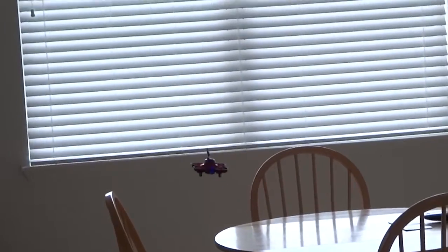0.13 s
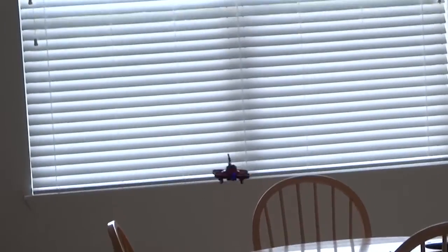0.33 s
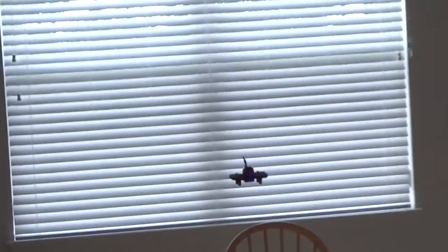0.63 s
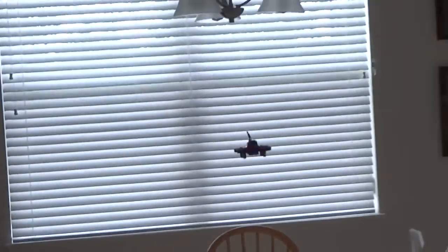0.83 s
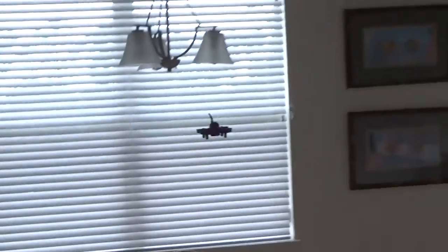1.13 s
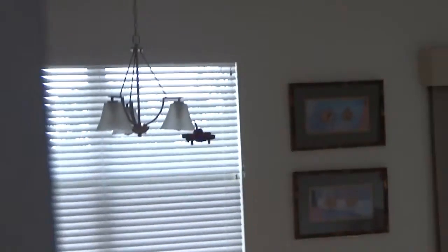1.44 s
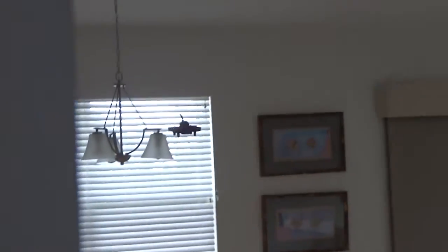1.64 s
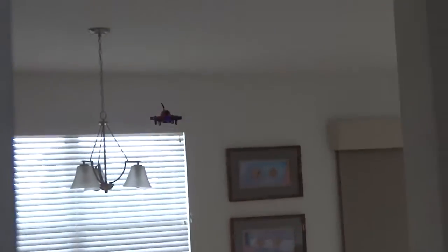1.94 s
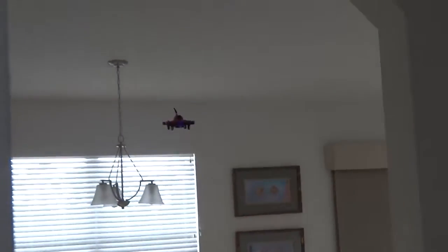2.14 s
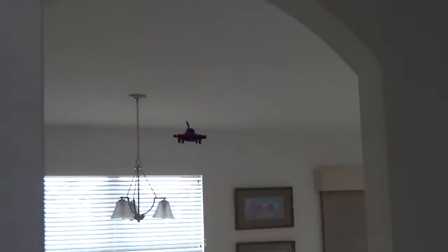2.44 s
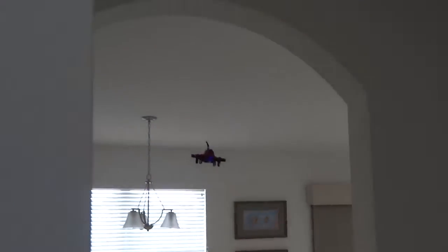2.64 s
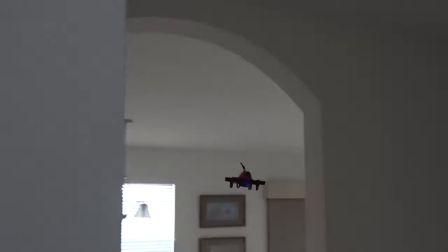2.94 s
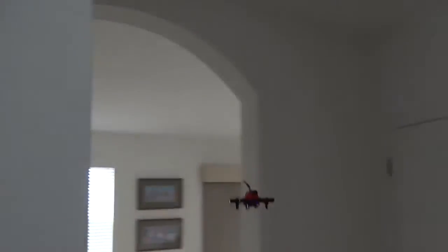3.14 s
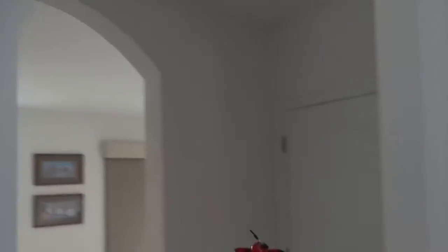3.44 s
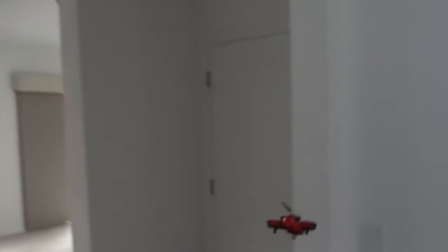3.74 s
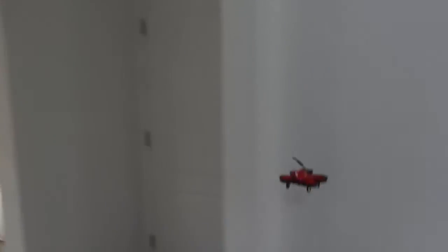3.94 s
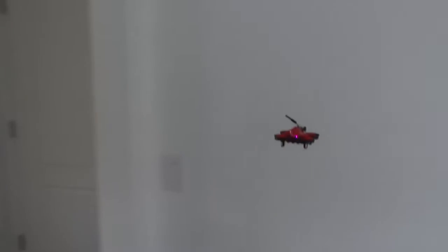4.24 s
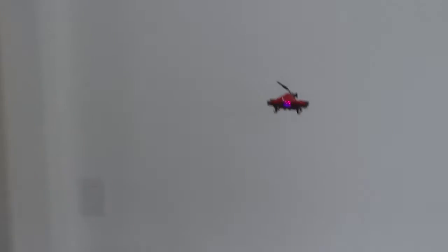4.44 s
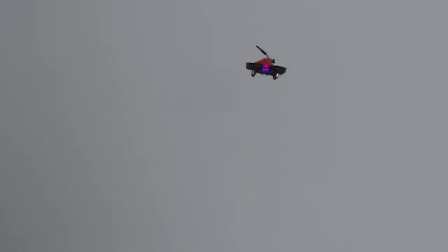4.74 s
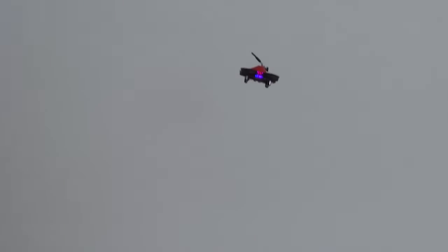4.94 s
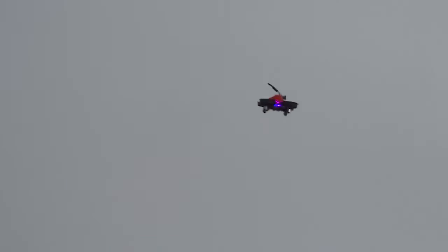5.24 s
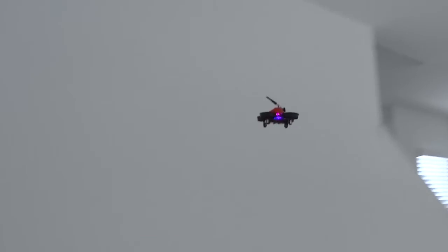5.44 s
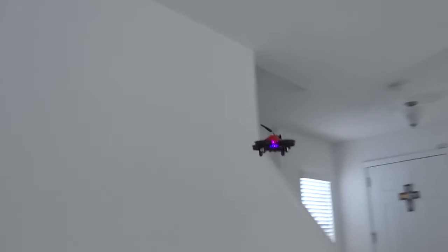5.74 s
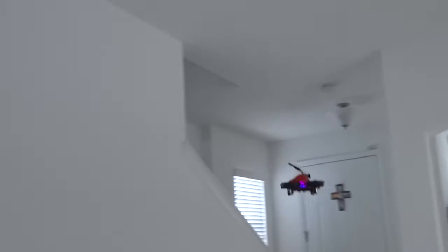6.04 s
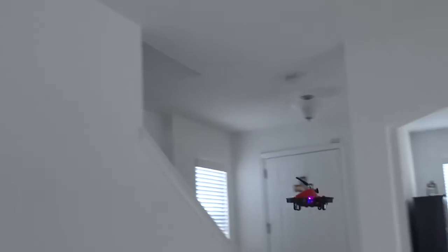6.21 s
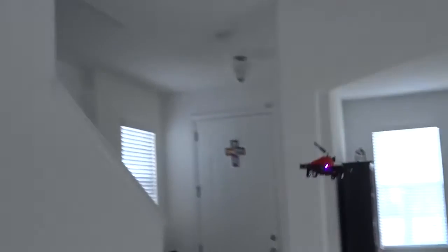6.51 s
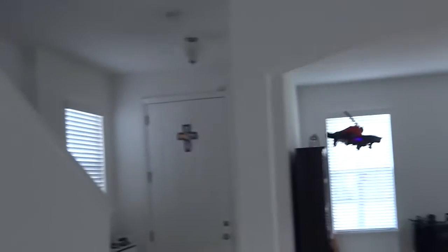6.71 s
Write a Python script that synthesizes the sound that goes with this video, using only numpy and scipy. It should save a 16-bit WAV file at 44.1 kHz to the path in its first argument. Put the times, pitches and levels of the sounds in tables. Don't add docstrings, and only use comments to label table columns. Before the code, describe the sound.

A miniature four-rotor drone is already flying at 0 s, whining without a break in a hard-walled living room. Four slightly different blade tones around 1.6 to 1.9 kHz beat roughly together, with buzzing overtones, rushing air, bright blade hiss and a thin wavering whistle near 10 kHz. Two sharp plastic clicks snap close to the microphone at about 0.37 and 0.53 s, the second louder. A faint scuff comes near 2 s. The drone is faintest around 1.7 s, then approaches; pitch surges from 3.4 s and it is loudest near 3.8 to 4.1 s. A soft step lands at 4.2 s. Pitch sags around 5 s, a tap and scuff fall at 5.5 to 5.6 s, and throttle rises again from 6.2 s, the drone still close at the end. Wall echoes and very faint low house rumble surround it, almost centred.

```python
import sys
import numpy as np
from scipy import signal
from scipy.fft import rfft, irfft
from scipy.io import wavfile
from scipy.ndimage import uniform_filter1d

SR = 44100
rng = np.random.default_rng(int(sys.argv[2]) if len(sys.argv) > 2 else 0)


def generate_wav(signal):
    frames = np.transpose(np.atleast_2d(signal))
    scaled = np.clip(frames, -1, 1) * 32767
    pcm = np.round(scaled).astype(np.int16)
    wavfile.write(sys.argv[1], SR, pcm)


def invert_db(x):
    u = np.asarray(x, float) / 20
    return 10 ** u


N = 302967
T = np.arange(N) / SR
SOUND_M_S = 343

# (frequency [Hz], density [dB per Hz])
HOUSE_COLOUR = [(20, -31), (60, -12), (100, -7), (130, -1.5), (200, 6.5), (400, 2.5), (800, -5),
                (2000, -39)]
# (time [s], level [dB], centre [Hz], t60 [s])
STEPS = [
    (1.02, -52, 700, 0.98),
    (1.977, -43, 750, 0.18),
    (2.0, -50, 555, 0.6),
    (3.55, -50, 450, 1.3),
    (4.174, -44, 600, 0.11),
    (4.218, -35.5, 596, 0.25),
    (4.25, -40.5, 600, 0.67),
    (5.503, -33.5, 800, 0.067),
    (5.51, -40, 620, 1.03),
    (5.612, -40.5, 746, 0.8),
]
# (time [s], crack level [dB], crack [Hz], body level [dB])
CLICKS = [
    (.3655, -18, 2700, -33),
    (.53372, -9.5, 3500, -29),
    (.5125, -35, 2000, -40),
    (.5205, -33, 2400, -42),
]
# (time [s], nearness as tip hiss level [dB],
#          facing of front ducts [dB], rear ducts [dB], motor drive [dB])
FLIGHT = [(0, -36.5, -2.5, -13, -7), (.2, -37, -3, -18.5, -5), (.52, -37.5, -11, -12, -3.5),
          (.9, -37, -1, -15, -6.5), (1.3, -38.5, -4.5, -16, -3.5), (1.7, -39.5, -3, -9.5, -7.5),
          (2.28, -33.5, -3.5, -14.5, -5.5), (3.06, -32.5, -10.5, -15, -10), (3.2, -31, 3, -11, -13),
          (3.36, -30, -7, -19, -13), (3.8, -27, -1.5, -15.5, -18), (4.1, -27.5, 0, -15, -18),
          (4.6, -30, -2, -3.5, -12), (4.9, -31, -10, -6.5, -8), (5.57, -29.5, -9.5, -13, -13),
          (5.97, -28.5, -6, -13, -24), (6.2, -28, -2, -12.5, -13.5), (6.87, -29.5, -2, -7, -1.5)]
# (time [s], speed towards camera [m/s])
APPROACH = [(0, .9), (.5, .85), (.9, .55), (1.4, .6), (2.2, 1), (2.5, 1.15), (3, 1), (3.4, .25), (4, .1),
            (4.6, -.1), (5.5, .05), (6.2, .1), (6.87, -.2)]
# (time [s], rotor 1 [Hz], rotor 2 [Hz], rotor 3 [Hz], rotor 4 [Hz])
SHAFT_HZ = [(0, 443.6, 438, 406.6, 405.8), (.36, 459.5, 446.5, 415.5, 413.5),
            (.62, 449.5, 440.5, 410.5, 409.5), (1.6, 441, 429.5, 405, 403),
            (1.85, 434, 424.5, 402.5, 384.5), (2.8, 436.5, 428.5, 396, 377.5),
            (3.34, 440.5, 435.5, 402.5, 373), (3.47, 462.5, 456, 405, 400),
            (3.76, 471.5, 458.5, 427.5, 403), (4.1, 475, 466.5, 449, 424), (4.4, 464, 459.5, 452, 425),
            (4.66, 438.5, 433.5, 428.5, 404.5), (5.06, 426.5, 418, 414.5, 386),
            (5.45, 432, 418, 399.5, 378.5), (6.01, 431.5, 416.5, 406, 380), (6.3, 466, 453.5, 441.5, 418.5),
            (6.6, 456.5, 452.5, 442, 426), (6.87, 476, 443.5, 435, 431)]
# (shaft multiple, rotors 1 to 4 re duct rush [dB, dB, dB, dB], blur [Hz])
OVERTONES = [(3, -32.5, -33.5, -28, -35.5, 15), (5, -19, -24, -21, -24, 18), (6, -23, -39, -41, -55, 11),
             (7, -24, -18.5, -16, -21.5, 25), (9, -46, -29.5, -25.5, -33.5, 27),
             (12, -20.5, -14, -15.5, -14.5, 40), (16, -18, -23, -15, -18, 40), (20, -19, -31, -14, -20, 46)]
HUM_DB = (-45, -40.5, -33.5, -38.5)
BLADE_DB = (-4.5, -4.5, -2, -4.5)
OCTAVE_DB = (-15, -13, -16, -12.5)
# (share of Doppler shift [ratio], sideways drift [Hz], level [dB])
WHISTLE_ECHOES = [(-1.1, 0, -5), (-.3, 0, -10), (.4, 16, -10), (.1, -20, -7)]
# (delay [s], path growth re approach speed [ratio], level [dB])
WALLS = [(.012, 2, -6), (.021, 1.2, -8)]
# (frequency [Hz], density [dB per Hz])
WASH_COLOUR = [(30, -70), (100, -59), (250, -25.5), (500, -14.5), (700, -11.5), (1200, -10), (1600, -5.5),
               (2000, -3.5), (2600, -17), (4000, -29)]
# (frequency [Hz], density [dB per Hz])
RUSH_COLOUR = [(1300, -37), (1600, -7), (2100, -11), (2600, -3.5), (3200, 2.5), (4000, -3), (5200, -2),
               (6200, -2), (8000, 0), (9500, 2), (10500, -8.5)]
# (frequency [Hz], gain [dB])
SHADED_RUSH = [(3800, -30), (5000, 0)]
# (frequency [Hz], density [dB per Hz])
HISS_COLOUR = [(9300, -32.5), (10000, 11), (11800, 6), (13500, 8), (14400, 4.5), (15100, -8), (15750, -2)]
# (frequency [Hz], gain [dB])
DULLED_HISS = [(13500, -30), (14800, 0)]
# (frequency [Hz], side minus mid [dB])
SPREAD = [(30, -5), (110, -10), (380, -12), (700, -9), (1300, -16), (2400, -15), (4400, -14), (8000, -19),
          (10000, -18), (11500, -18), (15000, -30)]

HOUSE_DB = -70.5
ROOM_T60_S, ROOM_DB = 1, -11
WHISTLE_HZ, TOP_HZ = 10020, 15730
MIDDLE_DB = -31
RUSH_DB, WASH_DB, WIDTH_DB = -1, -19, -0.5
RUSH_NEAR, WASH_NEAR, WIDTH_NEAR, HUM_NEAR = -0.035, -0.059, -0.3, 0.67
FACING_SHARE, HUM_FACING = 0.26, 0.44
FADE_DB, OCTAVE_FADE_DB, FADE_HZ = 2, 1.5, 4
WOBBLE_DB_PER_HZ = 0.1234
SHADE_DB_PER_DB = -0.22
DULL_DB_PER_DB = 0.4


def columns(table):
    s, *rest = np.transpose(table)
    return [np.interp(T, s, c) for c in rest]


def shape(x, points):
    hz, db = np.transpose(points)
    log_hz = np.log(np.fft.rfftfreq(x.shape[-1], 1 / SR) + 1)
    gain = invert_db(np.interp(log_hz, np.log(hz), db))
    return irfft(rfft(x) * gain, x.shape[-1])


def unit(x):
    return x / np.sqrt(np.mean(np.abs(x) ** 2))


def walk(rate_hz):
    knots = rng.standard_normal(2000)
    drift = np.interp(T * rate_hz, np.arange(len(knots)), knots)
    return unit(uniform_filter1d(drift, max(int(SR / rate_hz), 1)))


def tone(cycles, blur_hz, rough):
    rough = np.clip(rough, 0, 1)
    scatter = (walk(blur_hz) + 1j * walk(blur_hz)) / np.sqrt(2)
    envelope = np.sqrt(1 - rough) + np.sqrt(rough) * scatter
    return np.sqrt(2) * np.real(envelope * np.exp(2j * np.pi * cycles))


def air(colour, db, flicker_db):
    mid, side = shape(rng.standard_normal((2, N)), colour)
    gain = invert_db(db + flicker_db * walk(9)) / np.std(mid)
    return gain * mid, shape(gain * side, SPREAD)


def house():
    return air(HOUSE_COLOUR, HOUSE_DB, flicker_db=3.1)


def room(x):
    t = T[:SR]
    tails = rng.standard_normal((2, SR)) * invert_db(-60 * t / ROOM_T60_S) * (t > 0.004)
    tails = tails / np.sqrt(np.sum(tails[0] ** 2))
    wet = signal.fftconvolve(x[None], tails, axes=1)[:, :N]
    return invert_db(ROOM_DB) * wet[0], shape(invert_db(-0.5) * wet[1], SPREAD)


def walls(x):
    flown_m = np.cumsum(columns(APPROACH)[0] + 0.5 * walk(0.7)) / SR
    out = x
    for delay_s, growth, db in WALLS:
        heard_s = T - delay_s - growth * flown_m / SOUND_M_S
        out = out + invert_db(db) * np.interp(heard_s, T, x, left=0)
    return out


def steps():
    out = np.zeros(N)
    for s, db, hz, t60_s in STEPS:
        t = T - s
        sole = [(hz / 4, -25), (hz / 1.3, -3), (hz, 0), (hz * 3.5, -5), (hz * 5, -22)]
        grain = unit(shape(rng.standard_normal(N), sole)) * invert_db(2 * walk(90))
        decay = invert_db(db - 60 * np.clip(t, 0, 3) / t60_s)
        attack = np.clip(t / 0.001, 0, 1) * (1 + 0.7 * np.exp(-np.abs(t) / 0.006))
        out += decay * attack * grain
    return shape(out, [(120, -25), (280, 0), (9000, 0)])


def clicks():
    out = np.zeros(N)
    for s, crack_db, hz, body_db in CLICKS:
        t = np.clip(T - s, 0, 1)
        cycles = hz * t * (1 - 140 * np.minimum(t, 0.002))
        crack_env = np.minimum(t / 0.00025, 1) * np.exp(0.4 - t / 0.0006)
        low_env = t / 0.0024 * np.exp(1 - t / 0.0014)
        high_env = t / 0.0011 * np.exp(-t / 0.0009)
        out += invert_db(crack_db) * np.sin(2 * np.pi * cycles) * crack_env
        out += invert_db(body_db) * np.sin(2 * np.pi * 1000 * t) * low_env
        out -= invert_db(body_db + 11) * np.sin(2 * np.pi * 1800 * t) * high_env
    return shape(out, [(150, -9), (500, 1), (9000, -4.5)])


def wash(db):
    return air(WASH_COLOUR, db, flicker_db=0.54)


def rush(db, rear_db):
    shade = invert_db(SHADE_DB_PER_DB * (rear_db - np.mean(rear_db))) - 1
    return [x + shade * shape(x, SHADED_RUSH) for x in air(RUSH_COLOUR, db, flicker_db=0.3)]


def hiss(db, near_db):
    dull = invert_db(DULL_DB_PER_DB * near_db) - 1
    return [x + dull * shape(x, DULLED_HISS) for x in air(HISS_COLOUR, db, flicker_db=0.46)]


def whistle(db):
    shift_hz = WHISTLE_HZ * columns(APPROACH)[0] / SOUND_M_S
    out = invert_db(db) * tone(np.cumsum(WHISTLE_HZ + shift_hz) / SR, blur_hz=16, rough=0.28)
    for share, drift_hz, echo_db in WHISTLE_ECHOES:
        echo_hz = WHISTLE_HZ + share * shift_hz + drift_hz * (T / T[-1]) + 5 * walk(1.5)
        level = invert_db(db + 0.5 + echo_db + walk(3.3))
        out = out + level * tone(np.cumsum(echo_hz) / SR, blur_hz=7, rough=0.3)
    return out


def rotors(hiss_db, rush_db, front_db, rear_db):
    out = 0
    hum_near_db = HUM_NEAR * (hiss_db - MIDDLE_DB)
    hum_facing_db = HUM_FACING * (rear_db - np.mean(rear_db))
    for k, hz in enumerate(columns(SHAFT_HZ)):
        pair_db = (front_db, rear_db)[k // 2]
        blade_db = hiss_db + pair_db + BLADE_DB[k] + FADE_DB * walk(FADE_HZ)
        octave_db = hiss_db + OCTAVE_DB[k] + OCTAVE_FADE_DB * walk(FADE_HZ) + 2 * walk(12)
        hum_db = hiss_db + hum_near_db + hum_facing_db + HUM_DB[k] + 1.5 * walk(5)
        turns = np.cumsum(hz * (1 + 0.005 * walk(22))) / SR + rng.random()
        out = out + invert_db(blade_db) * tone(4 * turns, blur_hz=40, rough=0.33)
        out = out + invert_db(octave_db) * tone(8 * turns, blur_hz=35, rough=0.45)
        out = out + invert_db(hum_db) * tone(turns, blur_hz=14, rough=0.15)
        facing_db = rush_db + FACING_SHARE * (uniform_filter1d(blade_db - rush_db, SR // 3) + 9)
        for multiple, *db, blur_hz in OVERTONES:
            multiple = round(multiple)
            wobble_db = WOBBLE_DB_PER_HZ * (hz - np.mean(hz)) * (multiple % 4 > 0)
            level = invert_db(facing_db + wobble_db + db[k] + 1.5 * walk(11))
            out = out + level * tone(multiple * turns, blur_hz, rough=0.55)
    return out


def scene():
    hiss_db, front_db, rear_db, drive_db = columns(FLIGHT)
    near_db = hiss_db - MIDDLE_DB
    rush_db = hiss_db + RUSH_DB + RUSH_NEAR * near_db
    wash_db = hiss_db + WASH_DB + WASH_NEAR * near_db
    fans = walls(invert_db(-2) * rotors(hiss_db, rush_db, front_db, rear_db))
    direct = fans + whistle(hiss_db + drive_db) + steps() + clicks()
    parts = [house(), room(direct), wash(wash_db + 4), rush(rush_db + 2, rear_db),
             hiss(hiss_db + 0.5, near_db)]
    mid = direct + sum(p[0] for p in parts)
    width = invert_db(WIDTH_DB + WIDTH_NEAR * near_db)
    side = width * sum(p[1] for p in parts) - 0.034 * mid
    return np.array([mid + side, mid - side])


def band_limit(x):
    return signal.sosfilt(signal.butter(12, 15750, fs=SR, output="sos"), x)


def record(dry):
    mix = shape(dry, [(TOP_HZ, 0), (TOP_HZ + 40, -60)])
    return band_limit(mix)


dry = scene()
out = record(dry)
generate_wav(out)
```